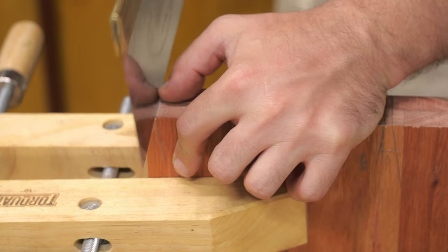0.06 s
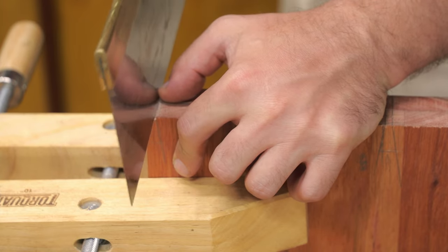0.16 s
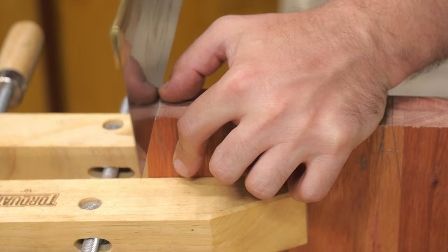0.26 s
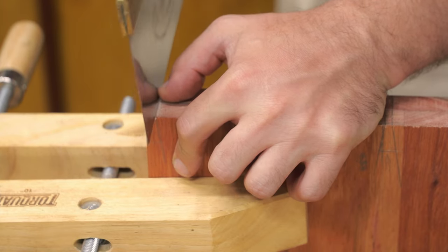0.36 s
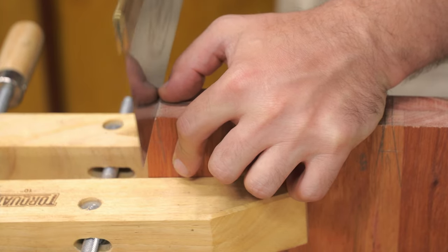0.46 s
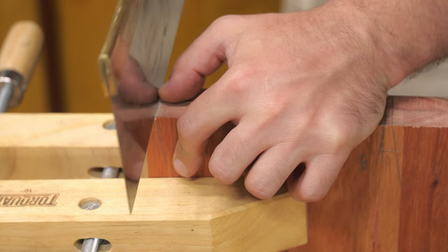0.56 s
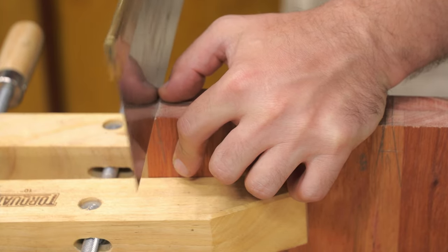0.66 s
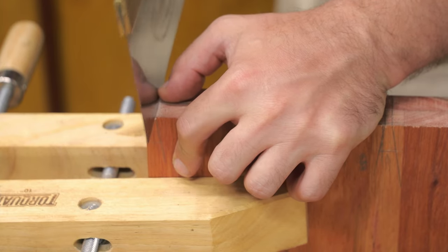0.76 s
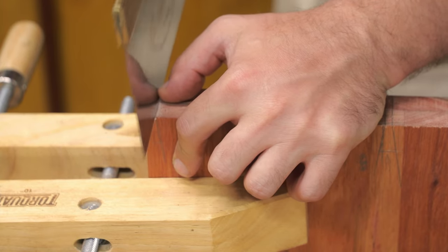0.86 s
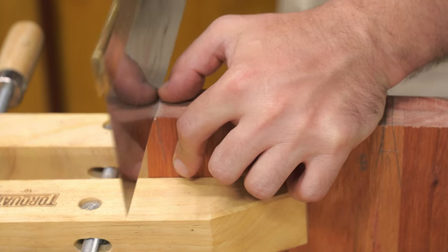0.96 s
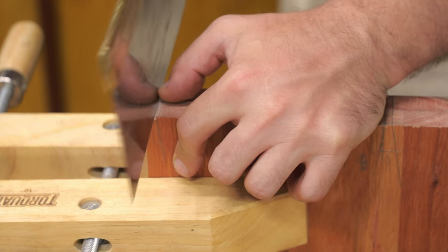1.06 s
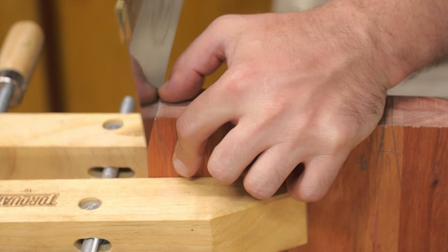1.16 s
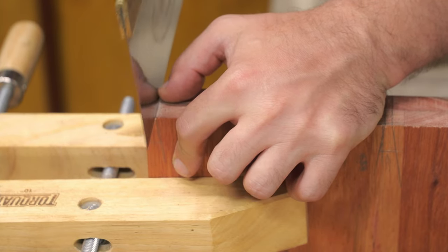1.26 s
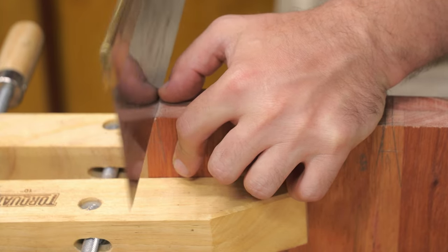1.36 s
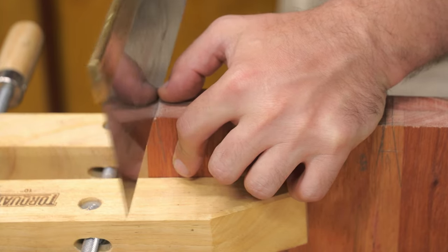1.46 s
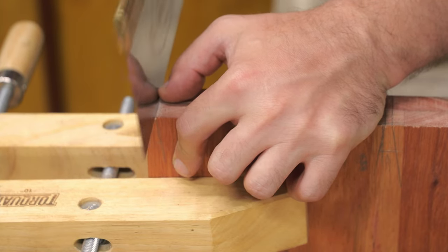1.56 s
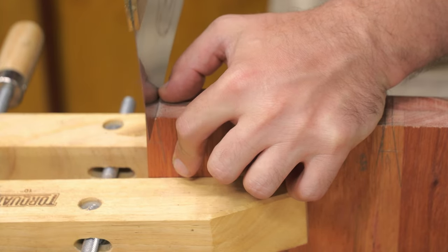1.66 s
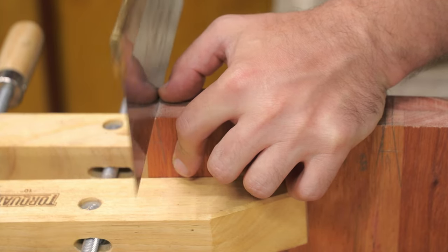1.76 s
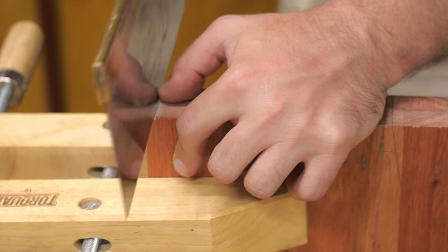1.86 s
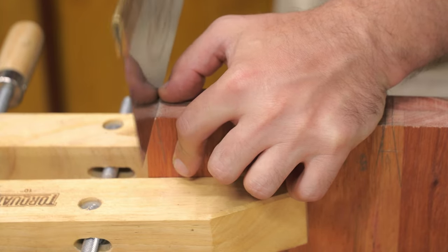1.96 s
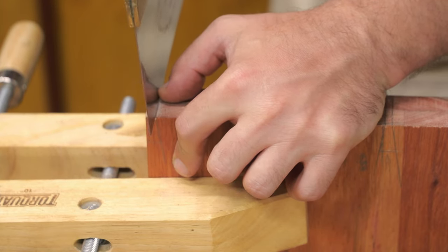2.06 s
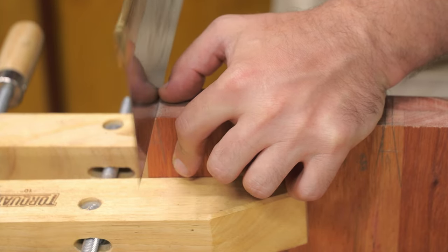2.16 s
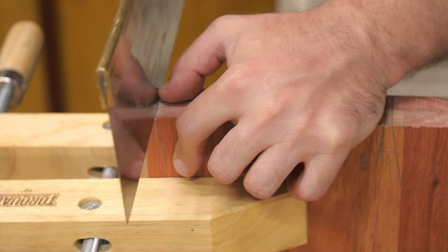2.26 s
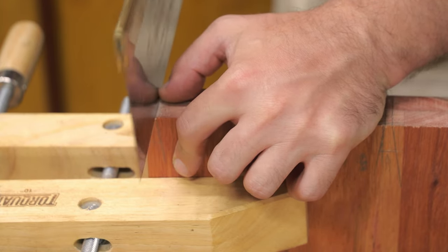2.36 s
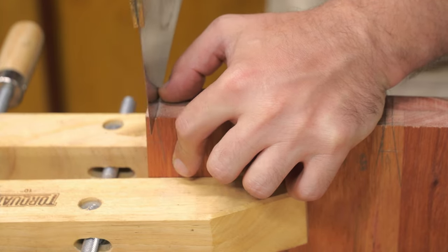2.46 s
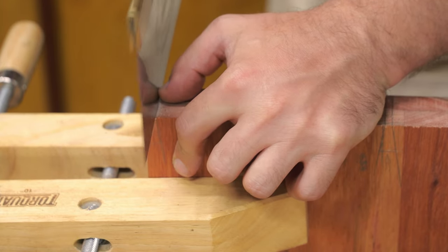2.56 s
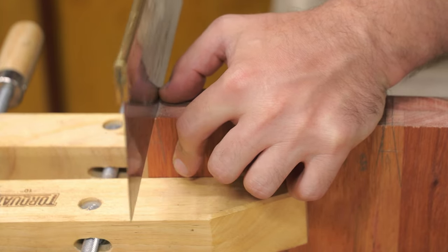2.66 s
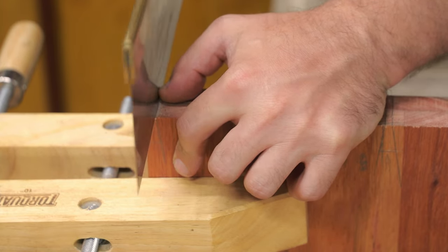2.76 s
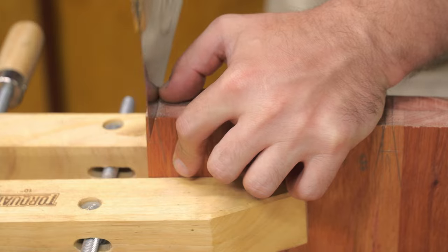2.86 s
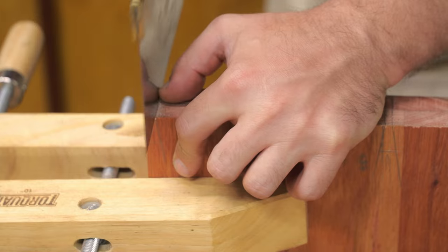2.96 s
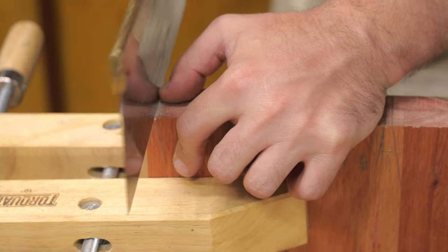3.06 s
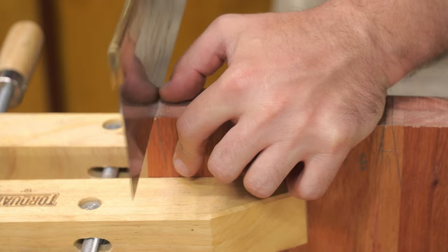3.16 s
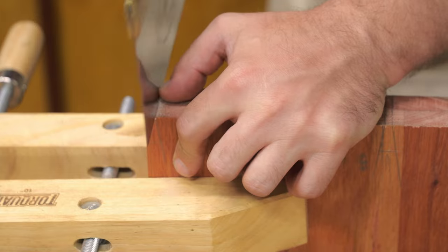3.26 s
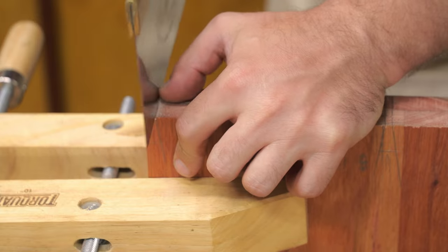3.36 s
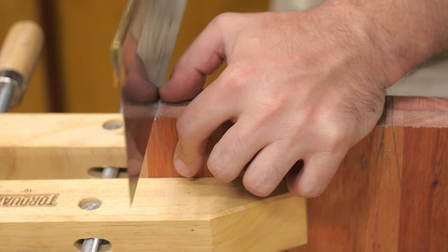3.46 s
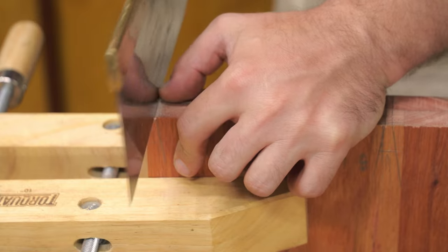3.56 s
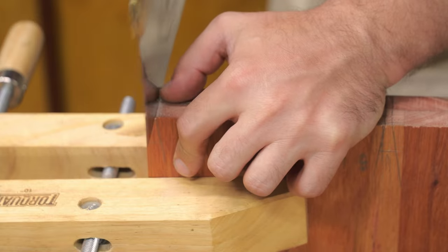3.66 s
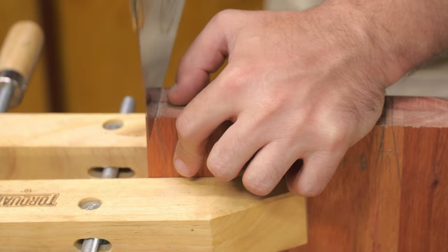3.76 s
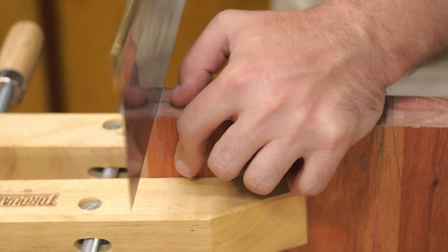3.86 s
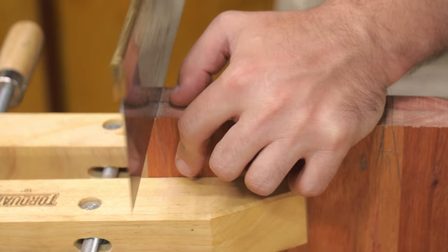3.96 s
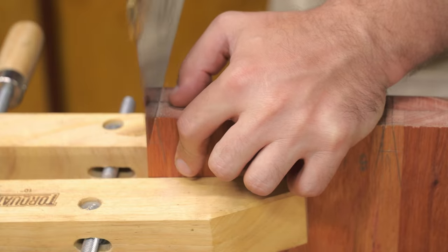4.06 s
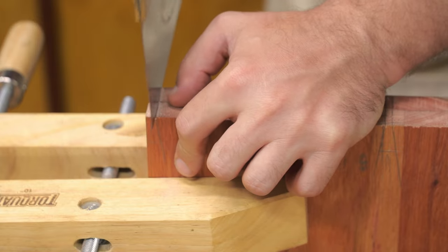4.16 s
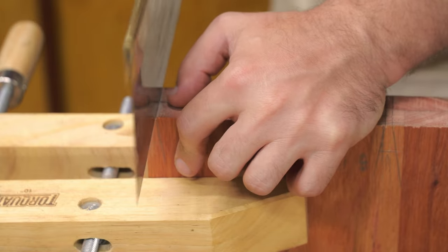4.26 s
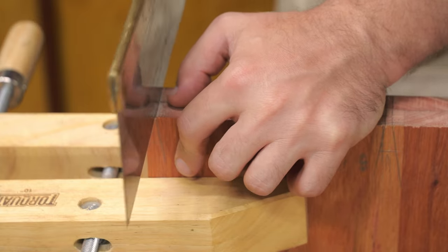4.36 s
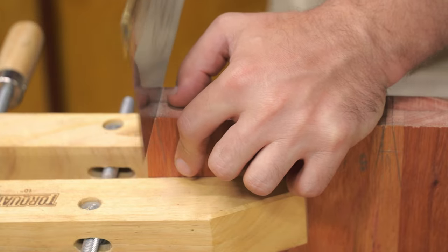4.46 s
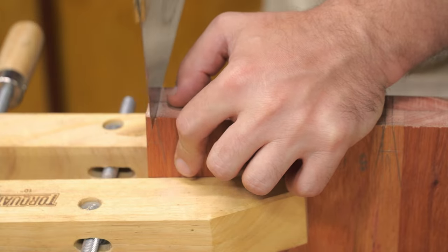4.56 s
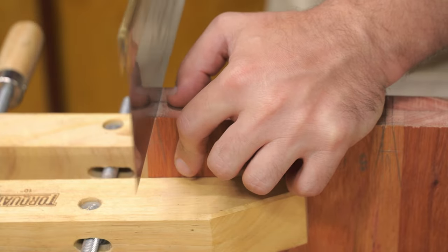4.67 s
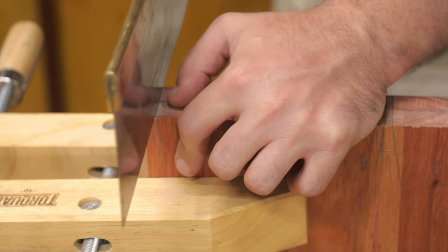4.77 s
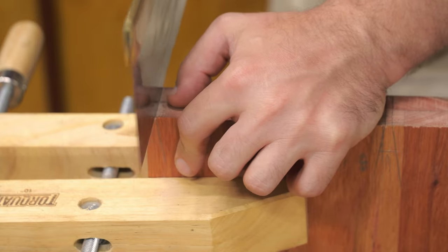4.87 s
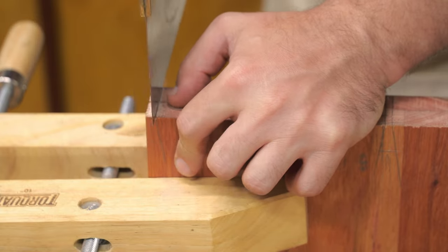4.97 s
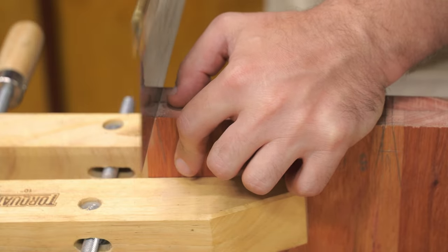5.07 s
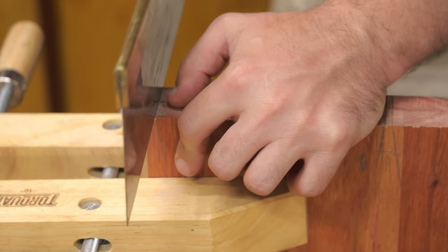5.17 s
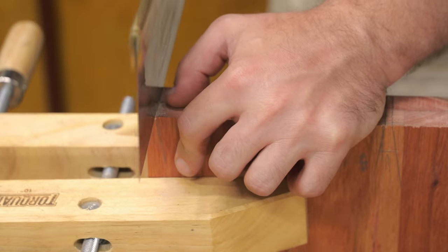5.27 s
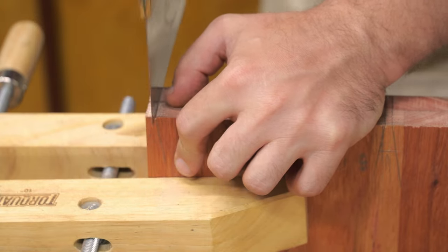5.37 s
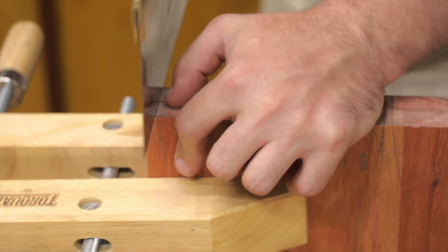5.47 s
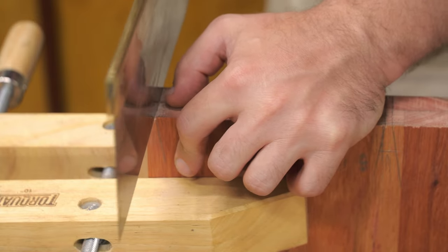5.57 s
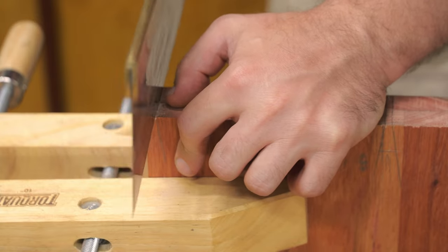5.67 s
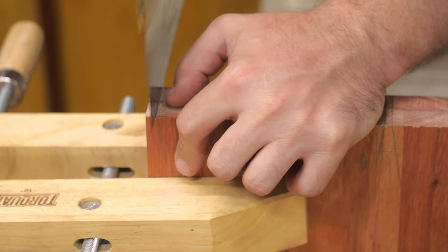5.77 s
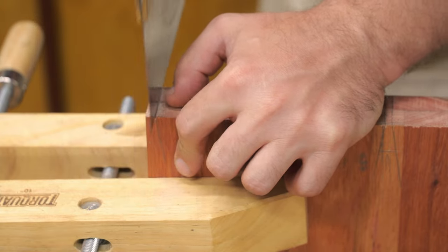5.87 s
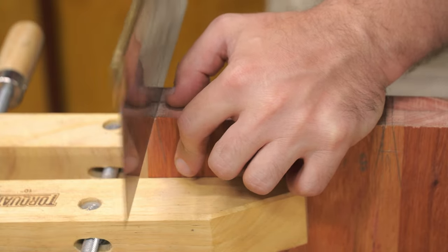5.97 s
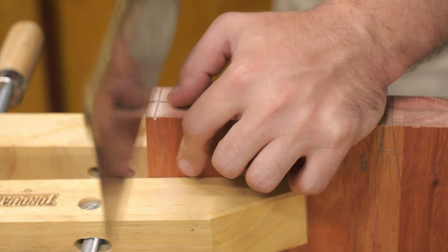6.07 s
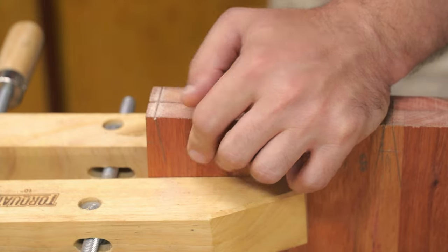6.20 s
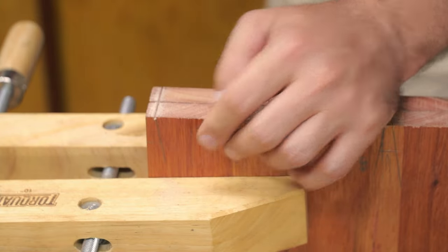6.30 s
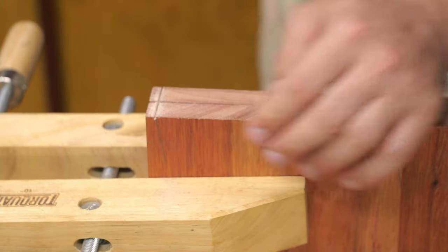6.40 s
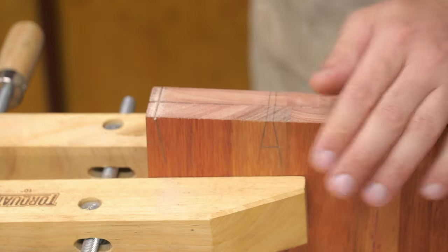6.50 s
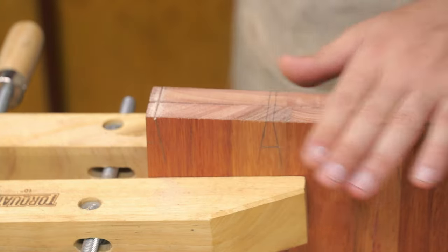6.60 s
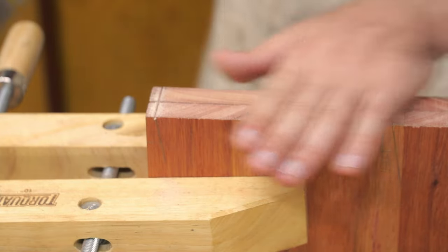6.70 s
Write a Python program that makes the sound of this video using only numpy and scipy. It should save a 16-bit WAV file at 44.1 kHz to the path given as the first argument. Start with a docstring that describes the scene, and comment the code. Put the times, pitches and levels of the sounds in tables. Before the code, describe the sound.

Rapid hand sawing heard near the microphone: each short stroke swells and dips, bright tearing rasp over a hollow board hum and low bench rumble, with steel pings where teeth catch. After six seconds the saw leaves the cut, rings for a moment, and faint finger touches follow in a quiet, slightly reverberant shop.

```python
"""Small, quiet workshop: a thin-bladed hand saw cuts a clamped hardwood board, about five strokes a second.
Irregular tooth clicks and friction noise drive resonances of board, bench and steel; noise gives the rasp.
Snags add knocks and pings. As the blade leaves the cut it rings free (decaying sines), then a hand
slides off the board (shaped noise and soft touches). Feedback delays and steady noise give room and air."""
import sys
import numpy as np
from scipy import signal
from scipy.io import wavfile
from scipy.ndimage import uniform_filter1d

SR = 44100
rng = np.random.default_rng(int(sys.argv[2]) if len(sys.argv) > 2 else 0)


def master(y):
    """Save y as 16-bit WAV."""
    cut = np.clip(np.atleast_2d(y).T, -1, 1)
    pcm = np.round(cut * 32767)  # scale
    wavfile.write(sys.argv[1], SR, pcm.astype(np.int16))


N = 297096
TIME_S = np.arange(N) / SR

# Levels in the tables are relative: each source adds its own gain.
# quiet room tone: f/Hz, density/dB per Hz
AIR_SPECTRUM = [(30, -7), (110, -3.5), (400, -11.5), (1100, -19), (2800, -27.5), (4000, -24), (9000, -27),
                (12500, -35.5), (15000, -46)]
AIR_DB = -70.5
# skin on wood: f/Hz, density/dB per Hz
HAND_SPECTRUM = [(35, -33), (80, -4), (260, 4), (550, -6.5), (1100, -24), (1450, -19), (2800, -29),
                 (5000, -29), (11000, -42), (15000, -61)]
# hand sliding off the board: t/s, level/dB
HAND_SLIDE = [(6.28, -53), (6.296, -58), (6.31, -59), (6.326, -56), (6.336, -71), (6.73, -81)]
# fingers touch the wood: t/s, board thud level/dB, bright tick level/dB
FINGER_TOUCHES = [(6.322, -55, -84), (6.403, -62, -66.5), (6.618, -68, -79), (6.647, -65, -62)]
# blade ringing free: f/Hz, level/dB, t60/s
FREE_BLADE_MODES = [(564.2, 0, 0.44), (647, -14, 0.34), (1320, -20, 0.18), (1860, -20, 0.28),
                    (2169, -28, 0.37)]
# heavy bench under the clamp: f/Hz, width/Hz, level/dB
BENCH_MODES = [(62.7, 4.4, -13), (88.5, 5.8, -1.5), (111.7, 4.3, -4.5), (127.6, 4, -9.5),
               (145.4, 13.4, -2.5)]
# board and clamp: f/Hz, width/Hz, level/dB
BOARD_MODES = [(194, 34, -11), (204.6, 6.3, -12.5), (237.6, 23.4, -5), (277.2, 11.3, 0), (303, 5.1, -13.5),
               (324.8, 18.8, -3), (369.3, 19.5, -2.5), (400.6, 19.6, 1.5), (435.6, 13.8, 1), (488, 15, -11),
               (554, 44, -8), (629.5, 21.5, -8.5), (678.5, 29, -16), (750, 9.5, -11), (803, 25, -16),
               (903.4, 18, -16), (953.5, 29, -16.5), (951, 18, -31)]
# board's quick, heavily damped answer to a hard snag: f/Hz, width/Hz, level/dB
KNOCK_MODES = [(250, 103, -2.5), (434, 130, 0)]
# blade gripped by the kerf: f/Hz, width/Hz, level/dB
BLADE_MODES = [(1293, 25, -11), (1348, 109, -8), (1444.5, 29.8, 2), (1515.4, 34, 1), (1595, 30, -10.5),
               (1693, 79, -11), (1850, 19, -14.5), (2100, 69, -20.5), (2440, 63, -26)]
# tearing fibres: f/Hz, density/dB per Hz
RASP_SPECTRUM = [(700, -0.5), (1500, 0.5), (2200, -2), (2750, -15), (3200, -1), (3700, 0.5), (4400, -2.5),
                 (5300, -0.5), (6500, -1.5), (7600, -4.5), (8800, -11), (10000, -10.5), (12500, -16),
                 (16000, -26)]
# narrow high tones that colour the rasp: f/Hz, width/Hz, level/dB
SHIMMER_MODES = [(3058, 58, -4), (3240, 150, -6), (3568, 59, 0.5), (3780, 41, -6.5), (4100, 25, -6.5),
                 (4460, 34, -15.5), (4820, 94, -5), (5095, 31, 0), (5300, 80, -5), (5990, 27, -2.5),
                 (6420, 64, -6.5), (6460, 93, -6.5), (7470, 210, -14), (8800, 170, -6)]
# steel squeaks on the kerf wall as a forward stroke sets off: f/Hz, width/Hz, level/dB
SQUEAK_MODES = [(6680, 170, 18), (5100, 1600, -8)]
# strokes, back and forward in turn: start t/s, load on the board level/dB, briskness of the swing level/dB
STROKE_TABLE = [(-0.105, -28, 1), (0.099, -33.5, -1.5), (0.299, -29.5, -1), (0.504, -32, 0),
                (0.711, -30, 0.5), (0.918, -34, 1.5), (1.133, -29.5, 0), (1.339, -30.5, 0.3),
                (1.558, -31.5, 0), (1.762, -34.5, -0.1), (1.969, -28.5, 0.2), (2.179, -33.5, -1),
                (2.401, -28, 0.5), (2.607, -32.5, 0), (2.824, -33.5, -0.3), (3.027, -30, 1),
                (3.241, -38, 0), (3.443, -33, 0.5), (3.647, -34, 0.5), (3.85, -31, -0.7), (4.053, -34, 0.5),
                (4.261, -29.5, 0), (4.474, -23, 1), (4.68, -27.5, 0), (4.891, -30, -1), (5.097, -31, 0),
                (5.304, -30.5, -1.8), (5.514, -33.5, 0), (5.733, -30.5, 0), (5.942, -30.5, 1)]
# arm, per direction: fastest at/share of stroke, deepest bite at/share of stroke, blade level/dB, rasp level/dB
BACK_ARM = (0.465, .50, -38, -42)
FORWARD_ARM = (0.5345, .37, -35, -40.5)
# teeth catch in the grain: t/s, board level/dB, blade level/dB
HARD_SNAG_TABLE = [(0.548, -31.5, -40), (0.582, -24.5, -38), (0.979, -26, -48), (1.218, -28.5, -34),
                   (1.44, -28.5, -37), (1.844, -31.5, -40), (2.062, -27.5, -37), (2.299, -49, -31.5),
                   (2.441, -28.5, -35), (3.516, -25.5, -36.5), (3.914, -29.5, -51), (3.946, -35, -34),
                   (4.099, -32, -31.5), (4.127, -26.5, -38), (4.545, -22.5, -38), (4.558, -22, -42),
                   (4.573, -24, -34), (4.615, -34, -44), (4.748, -22, -45), (5.171, -27.5, -33),
                   (5.2, -27, -30.5), (5.864, -25.5, -45), (6.027, -23.5, -32.5)]

LIFT_S = 6.17  # the blade leaves the cut
# once the kerf is started, the arm works ever harder
PRESS_FROM_S, PRESS_DB_PER_S = 2.89, 2
RASP_PER_EFFORT_DB_PER_DB, RASP_PER_LOAD_DB_PER_DB = 0.5, 0.12
BENCH_PER_LOAD_DB_PER_DB, BLADE_PER_BRISKNESS_DB_PER_DB = 0.65, 0.56
# small snags: chance scatter about the deepest bite, levels relative to the stroke
SNAG_SCATTER_S, SNAG_SPREAD_DB = 0.04, 2.5
SNAG_BOARD_DB, SNAG_BLADE_DB = -2, 0
SNAG_STALL_DB = -22.5  # added in full at standstill
CUTOFF_HZ = 15850


def from_db(db):
    """Level in dB to amplitude ratio."""
    return 10 ** (np.asarray(db) / 20)


def rms_one(x):
    """Scale to unit rms."""
    return x / np.sqrt(np.mean(x ** 2) + 1e-20)


def butter(x, hz, kind):
    """Butterworth filter, design order 2."""
    return signal.sosfilt(signal.butter(2, hz, kind, fs=SR, output="sos"), x)


def fade(x, seconds):
    """One-pole smoothing: each click becomes a dying tail."""
    r = np.exp(-1 / (seconds * SR))
    return signal.lfilter([1 - r], [1, -r], x + 1e-18)


def steady(x, seconds):
    """Hold the short-term rms near one, leaving the faster grain."""
    size = max(int(seconds * SR), 8)
    power = uniform_filter1d(uniform_filter1d(x * x, size), size)
    return x / np.sqrt(np.abs(power) + 1e-12)


def drift(knots_per_s):
    """Smooth chance with a spread of about one: random knots joined by lines."""
    knots = rng.standard_normal(4000)
    return np.interp(TIME_S * knots_per_s, np.arange(len(knots)), knots) / np.sqrt(2 / 3)


def coloured_noise(spectrum):
    """Quarter-octave bands of noise following a spectrum; rms 1."""
    points, out = np.array(spectrum), 0
    edges_hz = np.geomspace(35, 17000, 37)
    white = rng.standard_normal((2, N))  # neighbouring bands use different noise
    for k, (low, high) in enumerate(zip(edges_hz, edges_hz[1:])):
        if high > points[0, 0]:
            db = np.interp(np.log(low * high) / 2, np.log(points[:, 0]), points[:, 1])
            out = out + from_db(db) * butter(white[k % 2], [low, high], "band")
    return rms_one(out)


def resonate(force, modes):
    """Parallel two-pole resonances of alternating sign, scaled to about keep white noise power."""
    out, power = 0, 0
    for k, (hz, width_hz, db) in enumerate(modes):
        r = np.exp(-np.pi * width_hz / SR)
        top = (1 - r * r) / 2
        poles = [1, -2 * r * np.cos(2 * np.pi * hz / SR), r * r]
        ring = signal.lfilter([top, 0, -top], poles, force + 1e-18)
        out = out + (-1) ** k * from_db(db) * ring
        power += top * from_db(db) ** 2
    return out / np.sqrt(power)


def blows(times_s, db):
    """Single-sample clicks of the given strengths."""
    out, heard = np.zeros(N), times_s >= 0
    out[(times_s[heard] * SR).astype(int)] = from_db(db[heard])
    return out


def bursts(times_s, db, rise_s, fall_s):
    """Envelope of brief jolts: fast rise to the level, then decay."""
    shape = fade(fade(signal.unit_impulse(SR // 10), rise_s), fall_s)
    return fade(fade(blows(times_s, db), rise_s), fall_s) / shape.max()


def shop_air():
    """Still air: steady noise with the room-tone spectrum."""
    return from_db(AIR_DB) * coloured_noise(AIR_SPECTRUM)


def workshop(x, t60_s=0.34, wall_hz=5500):
    """Feedback delays between the walls, duller on every round."""
    out, dull = np.zeros(N), np.exp(-2 * np.pi * wall_hz / SR)
    lags_s = np.geomspace(0.007, 0.043, 10)
    for k, lag in enumerate((lags_s * SR).astype(int)):
        loop, gain, state = x.copy(), from_db(-60 * lag / SR / t60_s), [0.]
        for i in range(lag, N, lag):
            back, state = signal.lfilter([gain * (1 - dull)], [1, -dull], loop[i - lag:i], zi=state)
            loop[i:i + lag] += back[:N - i]
        out += (loop - x) * (-1) ** k * np.sqrt(1 - gain * gain)
    return out


def hand(level_db=-4, touch_db=-4):
    """Skin brushes the wood as shaped noise; light touches excite damped wood modes."""
    slide_s, slide_db = np.transpose(HAND_SLIDE)
    brush_gain = from_db(level_db + np.interp(TIME_S, slide_s, slide_db, left=-120))
    brush = brush_gain * coloured_noise(HAND_SPECTRUM)
    at_s, thud_db, tick_db = np.transpose(FINGER_TOUCHES)
    thud_force = bursts(at_s, thud_db, rise_s=0.0024, fall_s=0.0088) * rng.standard_normal(N)
    tick_force = bursts(at_s, tick_db, rise_s=0.0022, fall_s=0.011) * rng.standard_normal(N)
    touches = resonate(thud_force, KNOCK_MODES) + resonate(tick_force, [(1480, 220, 0)])
    return brush + from_db(touch_db) * butter(touches, 1900, "low")


def free_blade(at_s=6.147, level_db=-38.5):
    """Out of the kerf, nothing damps the steel: its modes ring as decaying sines."""
    age_s = np.maximum(TIME_S - at_s, 0)
    rings = 0
    for hz, db, t60_s in FREE_BLADE_MODES:
        rings = rings + from_db(db - 60 * age_s / t60_s) * np.sin(2 * np.pi * hz * age_s)
    return from_db(level_db) * rings * (1 - np.exp(-age_s / 0.005))


def stroke_plan():
    """Timing and levels of each stroke, from direction, load, briskness and the arm's growing effort."""
    start_s, board_db, brisk_db = np.transpose(STROKE_TABLE)
    length_s = np.diff(start_s, append=LIFT_S)
    arm = np.array([BACK_ARM, FORWARD_ARM])[np.arange(len(start_s)) % 2]
    fastest, deepest, blade_db, rasp_db = arm.T
    effort_db = PRESS_DB_PER_S * np.maximum(start_s - PRESS_FROM_S, 0)
    load_db = board_db - board_db.mean()
    rasp_effort_db = RASP_PER_EFFORT_DB_PER_DB * effort_db + RASP_PER_LOAD_DB_PER_DB * load_db
    return {"start_s": start_s,
            "fastest_s": start_s + fastest * length_s,
            "deepest_s": start_s + deepest * length_s,
            "board_db": board_db,
            "bench_db": BENCH_PER_LOAD_DB_PER_DB * load_db,
            "blade_db": blade_db + effort_db + BLADE_PER_BRISKNESS_DB_PER_DB * brisk_db,
            "rasp_db": rasp_db + brisk_db + rasp_effort_db}


def swing(peaks_s):
    """Zero at each turn of the arm, sine arc to one at the given moment of each stroke."""
    turns_s = np.array(STROKE_TABLE)[:, 0]
    knots_s = np.append(np.column_stack([turns_s, peaks_s]).ravel(), LIFT_S)
    phase = np.interp(TIME_S, np.sort(knots_s), np.arange(len(knots_s)) * np.pi / 2)
    return np.abs(np.sin(phase))


def per_stroke(db):
    """Gain held through each stroke, smoothed at the turns."""
    which = np.searchsorted(np.array(STROKE_TABLE)[:, 0], TIME_S) - 1
    return uniform_filter1d(from_db(db)[np.maximum(which, 0)], size=600)


def setting_off(starts_s, after_s, width_s):
    """Short swell soon after each given turn, while the teeth still skate."""
    return sum(np.exp(-.5 * ((TIME_S - s - after_s) / width_s) ** 2) for s in starts_s)


def teeth(speed, rate_scale, uneven, spread_db):
    """One click per biting tooth: closer together at speed, uneven in spacing and depth."""
    passed = np.cumsum(rate_scale * (.25 + speed)) / SR
    chance = rng.standard_normal((9000, 2))
    at = np.searchsorted(passed, np.cumsum(np.exp(uneven * chance[:, 0])))
    clicks = np.zeros(N + 1)  # last slot takes the teeth past the end
    clicks[at] = from_db(spread_db * np.clip(chance[:, 1], -2, 2))
    return clicks[:N]


def snagging(plan, speed, count=2):
    """Hard snags plus small chance ones, gentler when slow: rows of t/s, board level/dB, blade level/dB."""
    usual = np.column_stack([plan["deepest_s"], plan["board_db"] + SNAG_BOARD_DB,
                             plan["blade_db"] + SNAG_BLADE_DB])
    usual = np.repeat(usual, count, axis=0)
    chance = np.clip(rng.standard_normal(usual.shape), -2, 2)
    at_s, board_db, blade_db = (usual + chance * [SNAG_SCATTER_S, SNAG_SPREAD_DB, SNAG_SPREAD_DB]).T
    slow_db = SNAG_STALL_DB * (1 - np.interp(at_s, TIME_S, speed))
    small = np.column_stack([at_s, board_db + slow_db, blade_db + slow_db])
    return np.vstack([HARD_SNAG_TABLE, small])


def bench(plan, force, speed, in_cut, bench_db=-44, lag_s=0.005):
    """The heavy bench resonates low, its drive level following the saw's speed a little late."""
    shake = (0.11 + speed ** 1.2) * in_cut * per_stroke(plan["bench_db"])
    late_shake = np.interp(TIME_S - lag_s, TIME_S, shake)
    return from_db(bench_db) * resonate(force * late_shake, BENCH_MODES)


def wood(plan, snags, force, bite, in_cut, board_db=-0.5, snag_db=3, knock_db=19):
    """The board growls under the downward load and knocks at each snag."""
    at_s, snag_level_db, _ = snags.T
    load = from_db(board_db) * per_stroke(plan["board_db"]) * (0.17 + bite ** 2.11) * in_cut
    # the board's modes answer slowly, so the judder is driven a little before the knock
    judder = bursts(at_s - .009, snag_level_db + snag_db, rise_s=0.0016, fall_s=0.0071)
    growl = resonate(force * np.hypot(load, judder), BOARD_MODES)
    knock = butter(resonate(blows(at_s, snag_level_db + knock_db), KNOCK_MODES), 810, "low")
    return butter(growl + knock, [140, 2000], "band")


def steel(plan, snags, force, bite, speed, in_cut,
          blade_db=-3, snag_db=2, skate_db=-45, wander_db=3.0, scuff_db=-7):
    """The blade sings with load and speed, pings at snags and chatters as it starts back."""
    at_s, _, snag_level_db = snags.T
    motion = 0.1 + speed ** 1.95 * bite ** 0.21
    load = from_db(blade_db) * per_stroke(plan["blade_db"]) * motion * in_cut
    skate = from_db(skate_db) * setting_off(plan["start_s"][2::2], after_s=0.035, width_s=0.017)
    ping = bursts(at_s - .004, snag_level_db + snag_db, rise_s=0.00035, fall_s=0.0092)
    push = force * np.hypot(load + skate, ping)
    # the kerf grips the blade at a moving point, so its modes trade a fixed total of energy
    energy = np.array([width_hz * from_db(db + wander_db * drift(24)) ** 2
                       for hz, width_hz, db in BLADE_MODES])
    share = np.sqrt(energy / energy.sum(axis=0))
    rings = sum((-1) ** k * resonate(push * share[k], [mode]) for k, mode in enumerate(BLADE_MODES))
    # the pinched part of the blade adds a broad, dead scuff
    scuff = from_db(scuff_db) * resonate(push * rng.standard_normal(N), [(1527, 114, 0)])
    return butter(rings + scuff, [800, 2700], "band")


def rasp(plan, snags, tearing, speed, in_cut, rasp_db=-0.95, shimmer_db=-3, grit=0.21,
         snag_db=-15, squeak_db=-50, flicker_db=1.16, fill=0.88):
    """Teeth tear off puffs of hiss; level rises with speed and flattens as gullets fill with dust."""
    at_s, snag_level_db, _ = snags.T
    motion = 0.08 + np.tanh(fill * speed ** 2.07) / np.tanh(fill)
    drive = from_db(rasp_db) * per_stroke(plan["rasp_db"]) * motion * in_cut
    # hard and soft fibres make the rasp come in clumps
    grain = steady(grit * tearing + .5, 0.0072) * from_db(flicker_db * drift(190))
    jolts = bursts(at_s, snag_level_db + snag_db, rise_s=0.0002, fall_s=0.0017)
    scrape = grain * np.hypot(drive, jolts)
    # each narrow high tone swells and fades by chance
    shimmer = 0
    for mode in SHIMMER_MODES:
        tone = resonate(scrape * rng.standard_normal(N), [mode])
        shimmer = shimmer + from_db(mode[2] + 4.2 * drift(30)) * tone
    squeak_swell = setting_off(plan["start_s"][1::2], after_s=0.051, width_s=0.0066)
    squeak = from_db(squeak_db + 4.3 * drift(5)) * grain * squeak_swell
    hiss = coloured_noise(RASP_SPECTRUM) * scrape
    hiss = hiss + from_db(shimmer_db) * shimmer / np.sqrt(len(SHIMMER_MODES))
    hiss = hiss + resonate(squeak * rng.standard_normal(N), SQUEAK_MODES)
    # slow teeth tear with less top
    bright = np.clip(0.62 + 0.23 * speed + 0.13 * drift(90), .15, 1.5)
    return bright * hiss + (1 - bright) * butter(hiss, 7500, "low")


def sawing(rub=0.3):
    """One train of tooth bites, with some friction noise, drives bench, wood, steel and rasp."""
    plan = stroke_plan()
    speed, bite = swing(plan["fastest_s"]), swing(plan["deepest_s"])
    in_cut = np.clip((LIFT_S - TIME_S) / 0.0078, 0, 1)
    clicks = teeth(speed, rate_scale=380, uneven=.4, spread_db=5.0)
    tearing = steady(fade(clicks, 0.0011), 0.045)
    bites = steady(butter(clicks, 60, "high"), 0.016)
    friction = rub * tearing * rng.standard_normal(N)
    force = steady(bites + friction, 0.0063)
    snags = snagging(plan, speed)
    return (bench(plan, force, speed, in_cut)
            + wood(plan, snags, force, bite, in_cut)
            + steel(plan, snags, force, bite, speed, in_cut)
            + rasp(plan, snags, tearing, speed, in_cut))


def scene():
    """The saw close by, with the room and its still air behind."""
    near = sawing() + free_blade() + hand()
    room = from_db(-16.5) * workshop(near)
    return (near + room + shop_air())[None]


def record(dry):
    """Steep elliptic low-pass cuts the top."""
    return signal.sosfilt(signal.ellip(12, .1, 90, CUTOFF_HZ, fs=SR, output="sos"), dry)


dry = scene()
out = record(dry)
master(out)
```